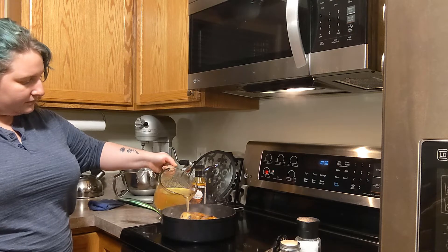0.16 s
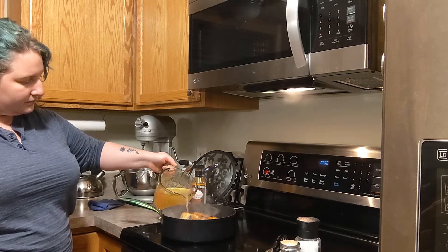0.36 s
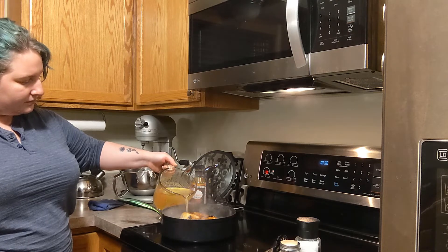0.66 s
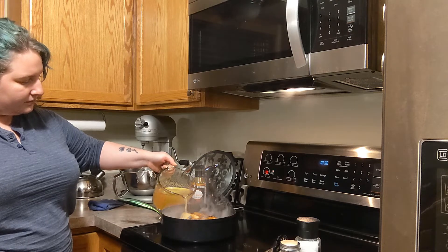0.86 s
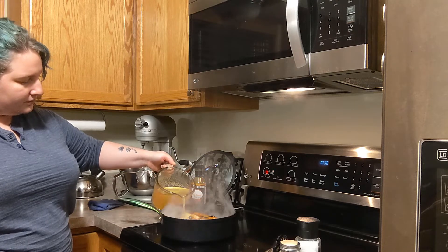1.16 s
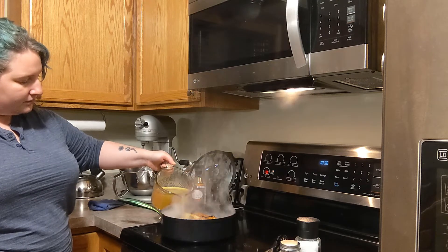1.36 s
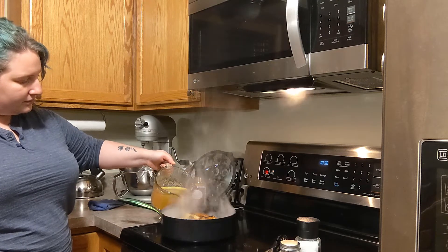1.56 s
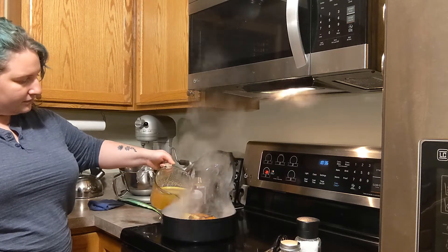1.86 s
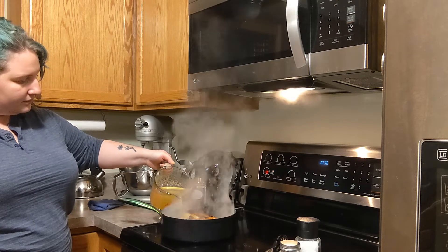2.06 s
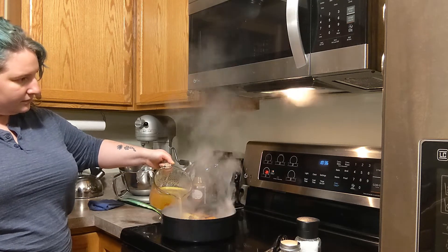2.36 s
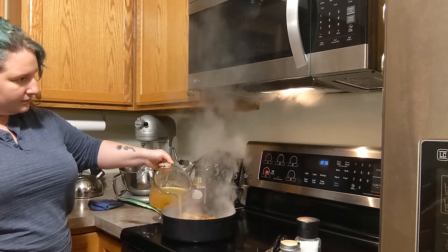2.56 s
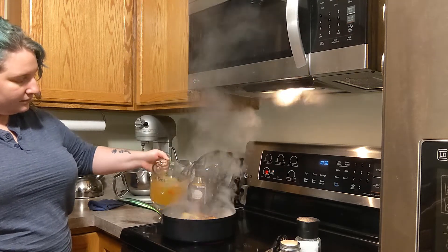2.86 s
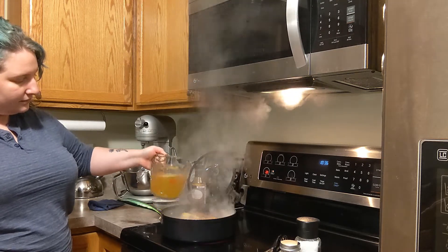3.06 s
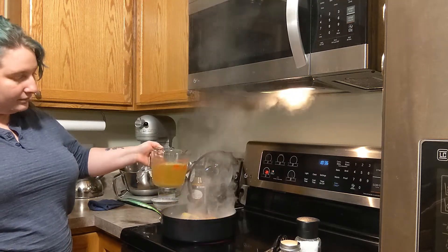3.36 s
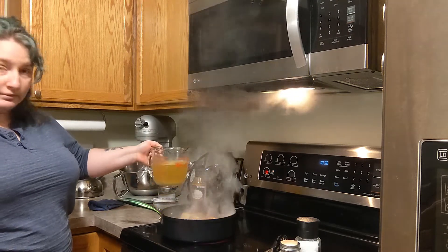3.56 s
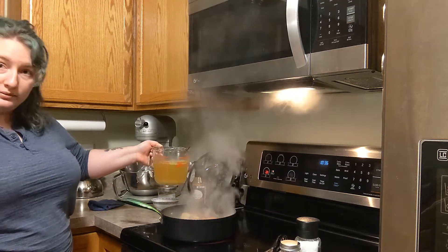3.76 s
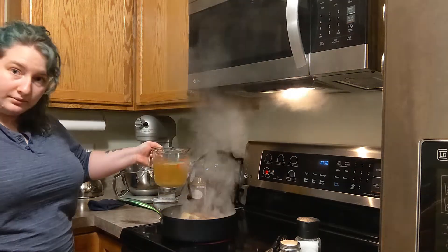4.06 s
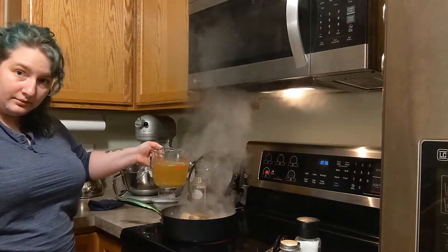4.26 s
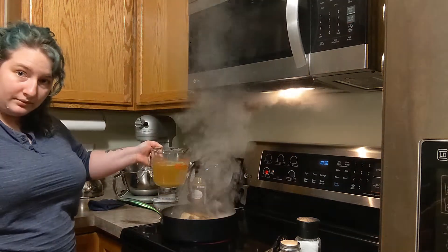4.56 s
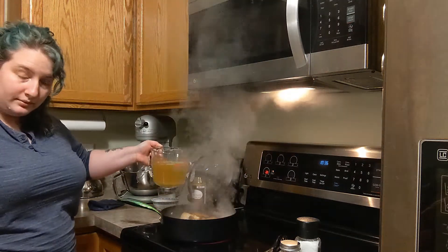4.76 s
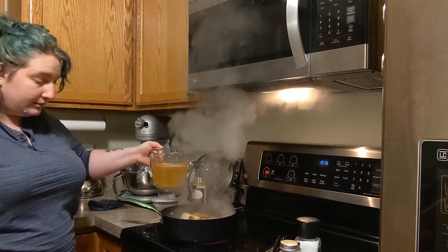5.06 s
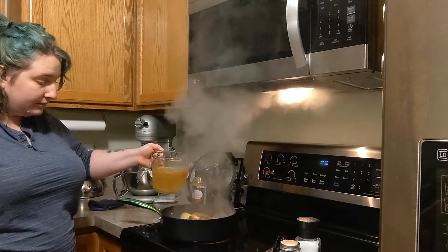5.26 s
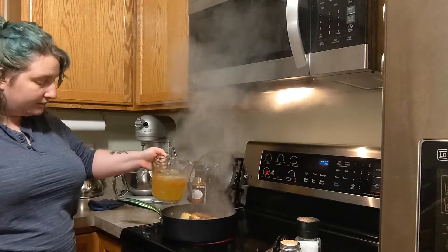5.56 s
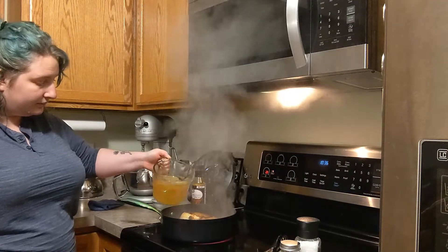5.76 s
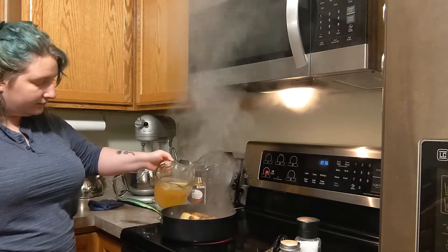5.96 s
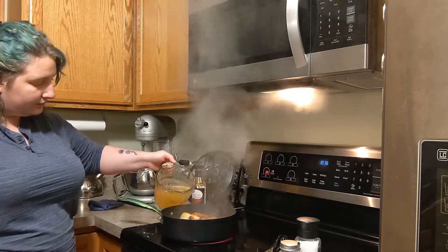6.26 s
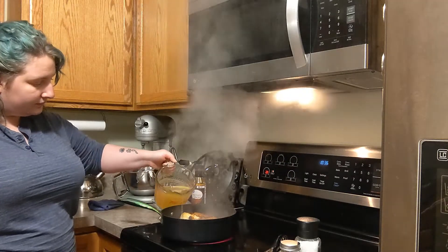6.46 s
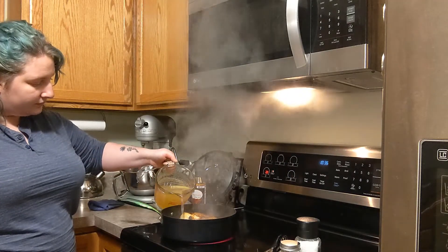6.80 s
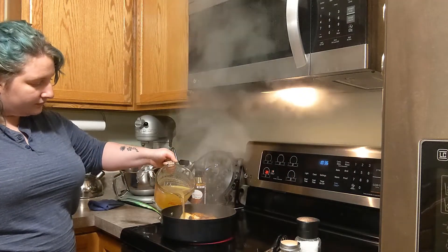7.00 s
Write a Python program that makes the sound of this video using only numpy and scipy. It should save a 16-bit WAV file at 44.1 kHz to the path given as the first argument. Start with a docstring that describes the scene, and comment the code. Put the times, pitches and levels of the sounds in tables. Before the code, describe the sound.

Close by in a home kitchen, a hot pan hisses and spits as stock turns to steam. The fine, flickering sizzle is fiercest through the first half, then gradually softens while a bubbling boil grows and rings faintly in the pan. Small, sharp pops are scattered throughout, a little right of centre in the stereo sound. A cooker hood drones low behind it all, with a barely audible soft thud late on.

```python
"""A bright, spitting hiss: stock flashing to steam as it is poured into a hot skillet on a kitchen range.
Thousands of tiny bubbles burst each second: the finest spit, larger ones sizzle, and the deepening pool
boils and drives the pan's resonances. Big bubbles knock the pan; a cooker-hood fan hums underneath, and
one faint thud comes near the end. The pan is a little nearer the right microphone of a stereo pair,
and a surface close by adds one short echo at each."""
import sys
import numpy as np
from scipy import signal
from scipy.fft import rfft, irfft, next_fast_len
from scipy.io import wavfile

SR = 44100
rng = np.random.default_rng(int(sys.argv[2]) if len(sys.argv) > 2 else 0)


def generate_wav(sig):
    """Save sig (samples, or channels by samples) to the path in sys.argv[1] as 16-bit PCM at SR."""
    pcm = np.round(np.clip(np.atleast_2d(sig).T, -1, 1) * 32767).astype(np.int16)
    wavfile.write(sys.argv[1], SR, pcm)


N = 314521

LEFT_LAG_S = 0.00013   # the pan is nearer the right microphone
FULL_BOIL_DB = -20   # the flash to steam at its fiercest
SIDES = np.array([[.5], [-.5]])   # splits a left-minus-right level between the microphones


def from_db(db):
    """Decibels to gain."""
    return 10 ** (np.asarray(db) / 20)


def rms_one(x):
    """Scale to unit rms."""
    return x / np.sqrt(np.mean(x ** 2) + 1e-20)


def at_hz(points, hz):
    """Read a table along log frequency."""
    points_hz, values = np.transpose(points)
    return np.interp(np.log(hz + 1), np.log(points_hz + 1e-20), values)


def drift(rate_hz):
    """Slow random wander of spread 1: low-passed noise, drawn at every 40th sample."""
    pole = np.exp(-2 * np.pi * rate_hz * 40 / SR)
    slow = signal.lfilter([1], [1, -2 * pole, pole * pole], rng.standard_normal(N // 40 + 2002))[2000:]
    return np.interp(np.arange(N) / 40, np.arange(len(slow)), rms_one(slow))


def ring_down(start_s, peak_db, pitch_hz, t60_s):
    """A single knock: a sine that starts at once and dies away."""
    age_s = np.clip(np.arange(N) / SR - start_s, 0, None)
    return from_db(peak_db - 60 * age_s / t60_s) * np.sin(2 * np.pi * pitch_hz * age_s)


def bursts(spread_db, per_s=30000):
    """Three unrelated streams of bubble bursts: random moments, sizes and signs."""
    born = rng.random((3, N)) < per_s / SR
    sizes = from_db(spread_db * rng.standard_normal((3, N))) * rng.choice([-1, 1], (3, N))
    return rms_one(born * sizes)


def hiss(spectrum, streams):
    """Coloured noise at the pair: one stream reaches both microphones, two are diffuse room sound."""
    # How alike the two microphones sound: frequency_hz, likeness (0-1)
    likeness = [(60, 1), (200, 0.78), (600, 0.75), (1200, 0.96), (2500, 0), (7000, 0.17), (15000, 0)]
    # Stereo balance: frequency_hz, left_minus_right_db
    balance = [(60, -.9), (200, -1.2), (500, .3), (3000, -.1), (11000, .3), (12000, -.8), (13000, -3.5),
               (14000, -1), (14600, 2.5), (15700, 6.2)]
    size = next_fast_len(N)
    hz = np.fft.rfftfreq(size, 1 / SR)
    direct, *diffuse = rfft(streams, size)
    alike = at_hz(likeness, hz)
    lag = np.exp(-2j * np.pi * hz * np.array([[LEFT_LAG_S], [0]]))
    pair = np.sqrt(alike) * direct * lag + np.sqrt(1 - alike) * np.array(diffuse)
    colour = from_db(at_hz(spectrum, hz) + at_hz(balance, hz) * SIDES)
    return rms_one(irfft(pair * colour, size)[:, :N])


def layer_level(flash_db, base_db, follows, dry_pan_db, db_per_s, cover_s=1):
    """A layer's level in dB: it follows the flash, settles as stock covers the pan, grows with depth."""
    t = np.arange(N) / SR
    uncovered = np.exp(-t / cover_s)
    return base_db + follows * (flash_db - FULL_BOIL_DB) + dry_pan_db * uncovered + db_per_s * t


def spit(flash_db, surge, flutter):
    """The finest bubbles burst in the high treble as stock flashes on the hot metal."""
    # Colour of the spit: frequency_hz, relative_db
    spectrum = [(5000, -24), (8000, -13), (10600, -9.5), (12000, -4.5), (13000, -2.6), (14100, -1.4),
                (15000, -.4), (15800, -1.4)]
    spray = hiss(spectrum, bursts(spread_db=2.5))
    return spray * from_db(flash_db + 0.12 * surge + 0.12 * flutter + 0.62 * drift(18))


def sizzle(flash_db, surge, flutter):
    """Larger bubbles hiss lower down; their top end follows the flash more closely than the rest."""
    # Colour of the sizzle: frequency_hz, relative_db
    spectrum = [(900, -25.5), (1500, -12), (2500, -6.5), (3500, -1.66), (5200, -2.5), (7000, -2),
                (8800, -2), (10500, -6.5), (13000, -8), (15800, -37)]
    level_db = layer_level(flash_db, base_db=-25.5, follows=0.5, dry_pan_db=-2.5, db_per_s=0.05)
    bubbles = hiss(spectrum, bursts(spread_db=4.5))
    bubbles *= from_db(level_db + 0.15 * surge + 0.17 * flutter + 0.47 * drift(26))
    top = signal.sosfilt(signal.butter(1, 6000, "high", fs=SR, output="sos"), bubbles)
    top_gain = from_db(0.24 * (flash_db - FULL_BOIL_DB))
    return bubbles + top * (top_gain - 1)


def boiling_pool(pool_db):
    """The gathering stock boils unevenly in the midrange."""
    # Colour of the boil: frequency_hz, relative_db
    spectrum = [(250, -18), (450, -17), (700, -9.5), (1000, -6), (1400, -1.5), (2000, -0.5), (3000, 2.5),
                (5000, -10.5)]
    return hiss(spectrum, bursts(spread_db=2)) * from_db(pool_db + 1.2 * drift(6.6))


def pan_ring(flash_db, pool_db):
    """Fine bursts and sparser large ones keep each resonance ringing, swelling and fading on its own."""
    # Resonances of pan and alcove: pitch_hz, width_hz, relative_db, left_minus_right_db,
    # pool_share (0-1), likeness (0-1), db_per_s (as the pool deepens)
    modes = [ (460, 12, -24, 1.5, 0.551, 0.9, 0.3), (529, 16, -23.5, 1, 0.67, 0.44, -0.8),
             (579, 13, -21.5, 3, 0.43, 0.8, .01), (668.2, 16.3, -13.5, 1.5, 0.76, 1, -0.05),
             (703, 42, -14.5, 2, 0.64, 0.88, -0.7), (797, 92, -13, -1, 0.82, 0.64, -0.3),
             (1000, 31, -11, -0.5, 0.84, 0.54, 0.06), (1095, 65, -12, -2.5, 0.6485, 0.65, -0.2),
             (1187, 37, -9.5, -1, 0.989, 0.2, -1.3), (1242, 29, -6.5, -7.5, 0.64, 0.52, 0.2),
             (1370, 57, -6, 2, 0.8, 0.43, 0.5), (1425, 56, -6, -3, 0.66, 0.54, 0.1),
             (1686, 35, -7.5, 4.5, 0.0616, 0.3, -.5), (1742, 59, -15, -2, .2, 0.54, -0.2),
             (1816, 50, -10, -5.5, .3, 0.6, 1.2), (1929, 50, -4.5, -1.5, 0.33, 0.46, 0),
             (2126, 101.16, -6.5, -5.5, .3, 0.23, -0.06), (2286, 94, -3, -2.5, 0.15, 0.5, 0.5),
             (2385, 92, -5.5, 1.3, .2, 0.66, -0.7), (2840, 130, -5.5, 1, 0.1863, 0.17, 0),
             (3096, 79, -11, 0, 0.1933, 0, 0)]
    ring_db = layer_level(flash_db, base_db=-38, follows=0.68, dry_pan_db=1.5, db_per_s=0.73)
    streams = bursts(spread_db=4.5) + from_db(-3.5) * bursts(spread_db=4, per_s=250)
    direct = np.array([np.roll(streams[0], round(LEFT_LAG_S * SR)), streams[0]])
    since_middle_s = (np.arange(N) - N / 2) / SR
    out = 0
    for k, (pitch_hz, width_hz, mode_db, side_db, pool_share, alike, db_per_s) in enumerate(modes):
        drive = np.sqrt(alike) * direct + np.sqrt(1 - alike) * streams[1:]
        drive = np.roll(drive, 16411 * k, axis=1)   # shifted so the modes ring independently
        radius, angle = np.exp(-np.pi * width_hz / SR), 2 * np.pi * pitch_hz / SR
        ringing = signal.lfilter([1, 0, -1], [1, -2 * radius * np.cos(angle), radius * radius], drive)
        trend_db = mode_db + pool_share * pool_db + (1 - pool_share) * ring_db + db_per_s * since_middle_s
        gain_db = trend_db + drift(2.2) + 1.47 * drift(22)
        out += rms_one(ringing) * from_db(gain_db + side_db * SIDES)
    return out


def hood_fan():
    """The hood over the range: slightly wavering motor and blade tones over a rumble of air."""
    # Motor turn and blade pass: pitch_hz, rms_db
    partials = [(48.4, -58), (338.8, -74)]
    # Air rumble as the room shapes it: frequency_hz, relative_db
    spectrum = [(25, -29), (43, -30), (54, 1), (68, -8.5), (83, -10), (108, 4), (138, -5), (148, -2),
                (163, -10), (180, -1), (215, -11.5), (290, -5.5), (400, -11.5), (900, -35)]
    wavering_s = np.cumsum(1 + 0.00286 * drift(3.2)) / SR
    hum = sum(np.sqrt(2) * from_db(rms_db + 1.5 * drift(3.9)) * np.sin(2 * np.pi * pitch_hz * wavering_s)
              for pitch_hz, rms_db in partials)
    air = hiss(spectrum, rng.standard_normal((3, N)))
    return hum * from_db(-0.8 * SIDES) + air * from_db(-52.5 + 0.8 * drift(3.2))


def pops():
    """Big bubbles knock the pan into a brief ring, right of centre."""
    # Knocks on the pan: start_s, peak_db, pitch_hz
    knocks = [(0.1313, -31, 2370), (0.3252, -27, 2310), (2.52, -31, 2330), (3.0294, -30, 2320),
              (3.045, -23, 2350), (3.0682, -24, 2220), (3.2575, -30, 2210), (3.9103, -26, 2280),
              (4.406, -32, 2250), (4.92, -30, 1370), (5.112, -26, 2380), (5.92, -26, 1340),
              (6.0591, -27, 1370), (6.9627, -31, 1340)]
    return sum(ring_down(*knock, t60_s=0.043) for knock in knocks) * from_db(-3 * SIDES)


def soft_thud():
    """One faint, soft thud in the bass."""
    return ring_down(start_s=6.415, peak_db=-38, pitch_hz=130, t60_s=0.15)


def near_echo(sound):
    """A surface close by returns the sound a millisecond late and ripples the treble."""
    # The reflection at the left, then the right microphone: delay_s, level_db, phase_turns
    echoes = [(.001017, -12, .34), (.001031, -13, .62)]
    delay_s, level_db, phase_turns = np.transpose(echoes)[:, :, None]
    size = next_fast_len(N + 200)
    hz = np.fft.rfftfreq(size, 1 / SR)
    reflected = hz ** 2 / (hz ** 2 + 2500 ** 2)   # a small surface reflects only short waves
    reflected /= 1 + (hz / 10000) ** 8   # and scatters the very shortest
    comb = 1 + reflected * from_db(level_db) * np.exp(-2j * np.pi * (hz * delay_s + phase_turns))
    return irfft(rfft(sound, size) * comb, size)[:, :N]


def scene():
    """The skillet and its echo over the fan; spit and sizzle flicker partly together as steam surges."""
    # How fiercely stock flashes to steam, heard as the fine spit: time_s, level_db
    flash = [(0.0, -23.5), (0.16, -23), (0.6, -21.5), (1.05, -20), (1.3, -21), (1.55, -20), (1.9, -21.5),
             (2.35, -20.5), (2.58, -20), (3.3, -20), (3.7, -21), (4.2, -21), (4.48, -20), (4.8, -22),
             (5.5, -23), (6.2, -26), (6.45, -27), (7.13, -28.5)]
    flash_db = np.interp(np.arange(N) / SR, *np.transpose(flash))
    pool_db = layer_level(flash_db, base_db=-39, follows=0.06, dry_pan_db=-6.5, db_per_s=0.5)
    surge, flutter = drift(9.3), drift(28)
    skillet = spit(flash_db, surge, flutter) + sizzle(flash_db, surge, flutter)
    skillet += boiling_pool(pool_db) + pan_ring(flash_db, pool_db) + pops()
    return near_echo(skillet) + hood_fan() + soft_thud()


def record(dry):
    """Each microphone port colours the treble; the deepest bass and the very top are cut."""
    # Port resonances: centre_hz, width_hz, left_db, right_db
    port_peaks = [(7100, 350, -.5, 2), (9500, 250, 2.5, -1), (11950, 250, 1.2, 2.2), (14050, 300, .6, 1.5),
                  (15050, 400, 1.5, .5)]
    size = next_fast_len(N + 2000)
    hz = np.fft.rfftfreq(size, 1 / SR)
    port_db = sum(np.array([[left_db], [right_db]]) / (1 + (2 * (hz - centre_hz) / width_hz) ** 2)
                  for centre_hz, width_hz, left_db, right_db in port_peaks)
    coloured = irfft(rfft(dry, size) * from_db(port_db), size)[:, :N]
    low_cut = signal.butter(2, 30, "high", fs=SR, output="sos")
    high_cut = signal.ellip(14, .3, 90, 15740, fs=SR, output="sos")
    return signal.sosfilt(high_cut, signal.sosfilt(low_cut, coloured))


dry = scene()
out = record(dry)
generate_wav(out)
```